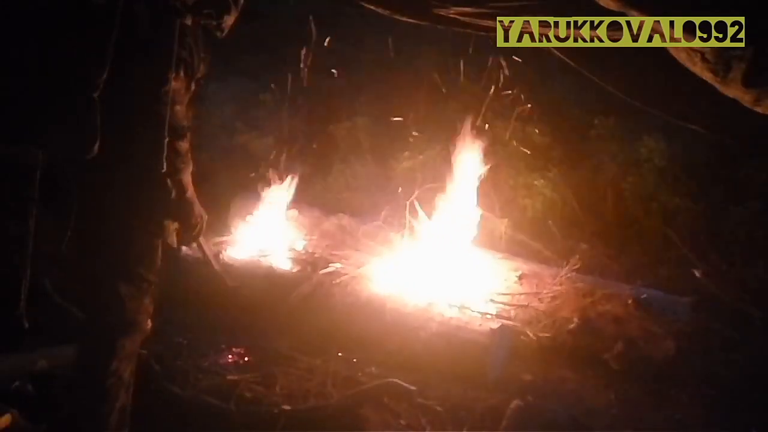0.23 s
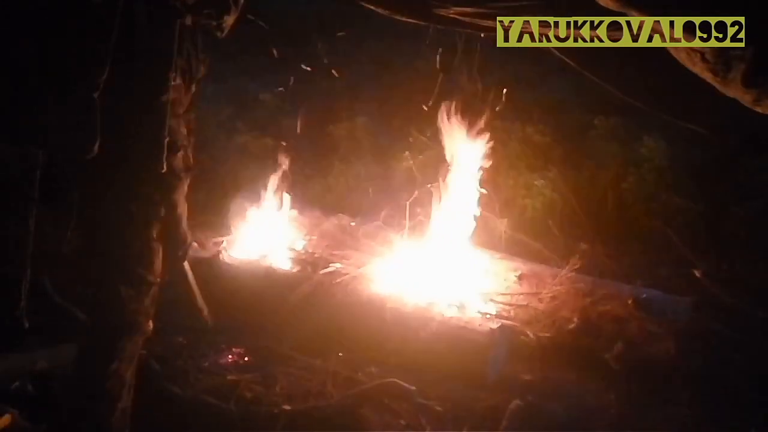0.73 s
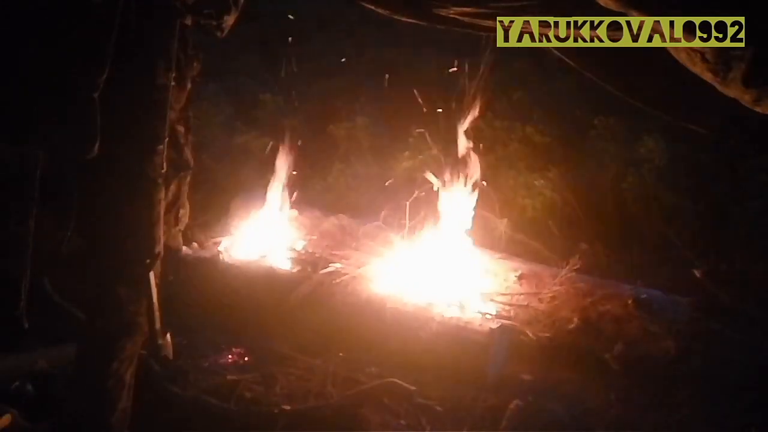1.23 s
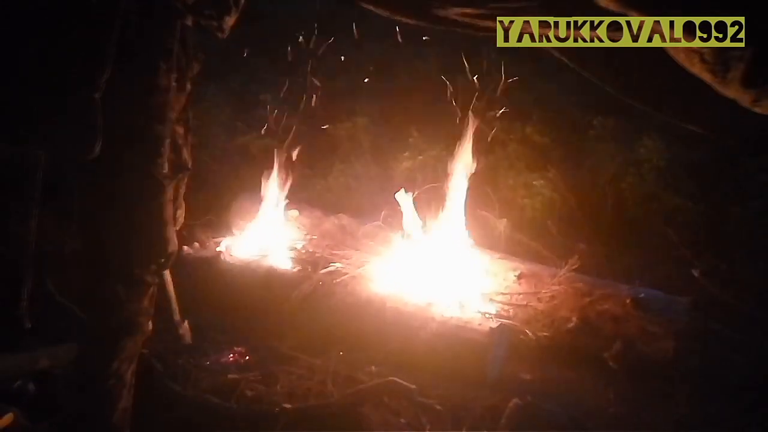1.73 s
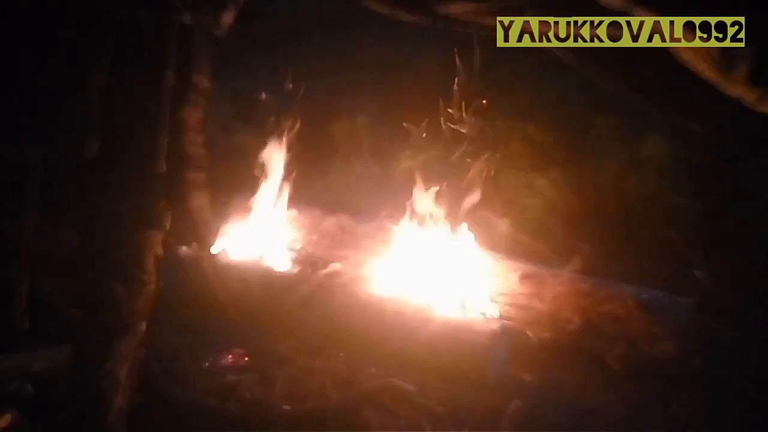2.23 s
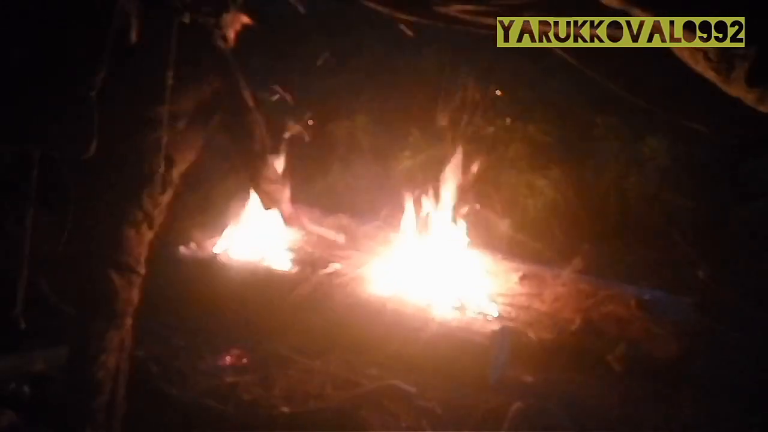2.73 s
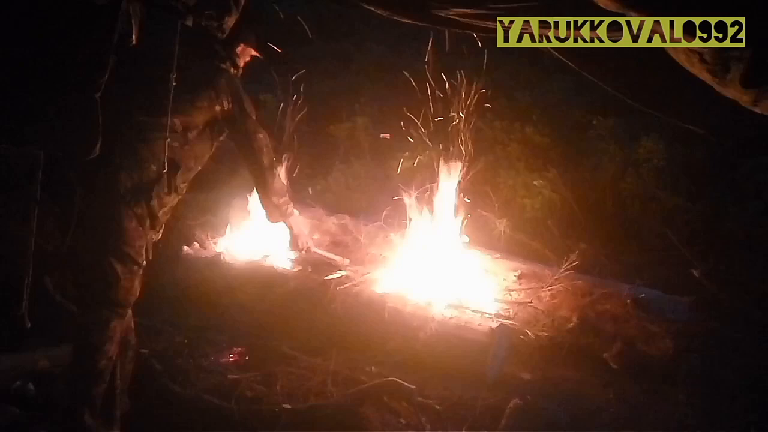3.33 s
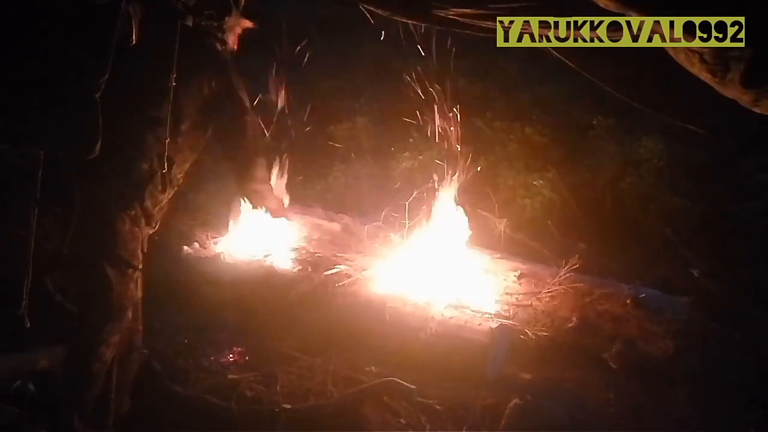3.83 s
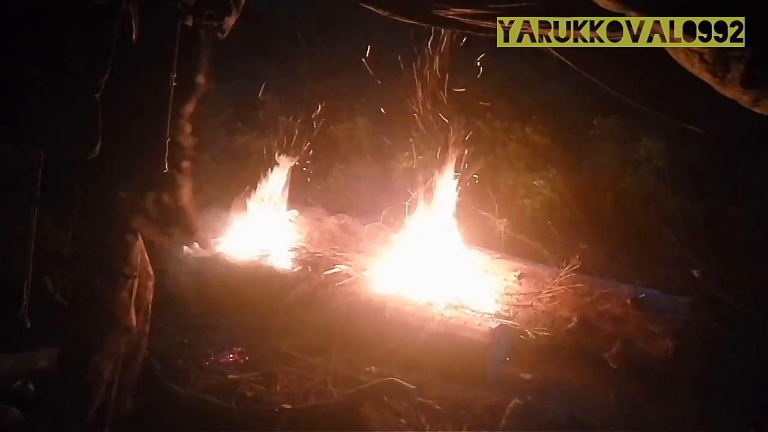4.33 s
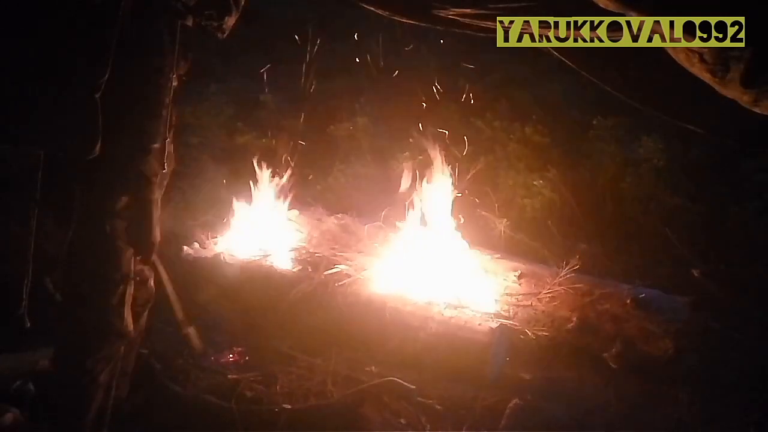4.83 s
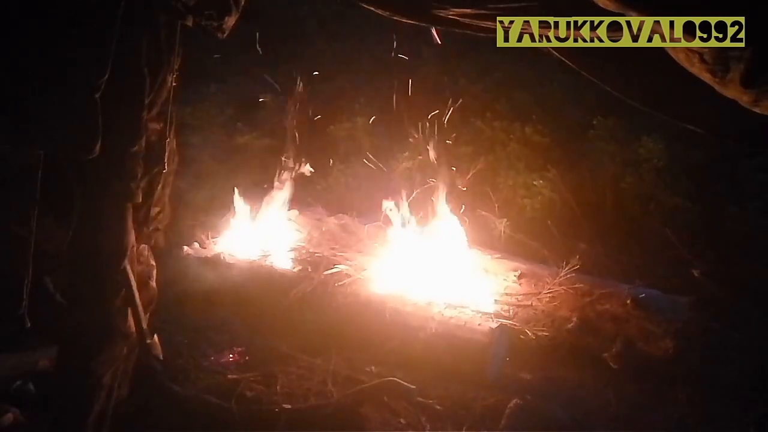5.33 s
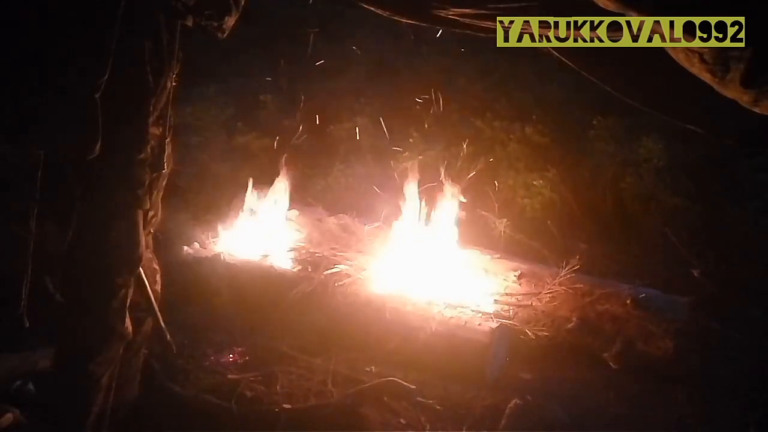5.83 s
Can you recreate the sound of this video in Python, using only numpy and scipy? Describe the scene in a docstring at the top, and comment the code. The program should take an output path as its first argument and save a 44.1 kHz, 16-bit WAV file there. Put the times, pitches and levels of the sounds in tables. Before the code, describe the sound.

Bright dry cracks of splitting wood burst at random over barely audible low flames, with brief sputtering gas spits and a short woodland tail.

```python
"""Sharp pops of splitting wood, hissing sap and low flames: a log fire outdoors at night, a few metres off.
Steam splits the wood: each fracture is a crack and torn fibres, ringing as snap, woody body and bright tick.
Smaller crackles, settling crumbs and ember ticks fall at random; a few knocks are decaying wood modes.
Gas jets, burning gas, sap and flames are coloured noise, and trunks and ground scatter a short tail.
The fire lies left of a small camera whose right microphone is turned away."""
import sys
import numpy as np
from scipy import signal
from scipy.fft import rfft, irfft
from scipy.io import wavfile
from scipy.ndimage import uniform_filter1d

SR = 44100
rng = np.random.default_rng(int(sys.argv[2]) if len(sys.argv) > 2 else 0)


def log_audio(samples):
    """Write samples as a 16-bit WAV file to the path given in sys.argv[1]."""
    # one column per channel
    frames = np.atleast_2d(samples).T
    # limit to full scale, then quantise
    limited = np.clip(frames, -1, 1)
    pcm = np.round(limited * 32767).astype(np.int16)
    wavfile.write(sys.argv[1], SR, pcm)


N = 268745
TIME = np.arange(N) / SR

# loud pops: start_s, snap_db, body_db (woody), tick_db (bright), pitch_hz (of the snap)
POPS = [(.145, -44, -55.5, -64, 5750), (0.1548, -43, -56.5, -66, 6000), (0.3341, -24.5, -58, -43, 5200),
        (0.354, -39.5, -54, -60, 5900), (0.4453, -41, -61, -57, 5900), (0.4638, -45, -55, -67, 5400),
        (0.4929, -31.5, -68, -55, 6960), (0.5107, -37, -49.5, -66, 5570), (0.539, -46, -62, -84, 4600),
        (0.5746, -52.5, -55.5, -69, 5700), (.6914, -17.3, -32, -44, 4830), (.737, -40.5, -70, -62, 5200),
        (0.7862, -46, -68, -79, 5370), (0.8137, -31.5, -59, -51, 6600), (1.0007, -39, -61.5, -59, 7000),
        (1.088, -21, -47, -41, 5600), (1.126, -39, -55, -54.5, 6100), (1.1989, -39, -54.5, -50, 6170),
        (1.24, -43, -64, -53.5, 7250), (1.2804, -44, -67, -64, 5800), (1.2981, -39, -55, -56, 5540),
        (1.771, -29.5, -61, -39.5, 6300), (1.87, -45.5, -64, -62, 6100), (1.9282, -46, -68, -62.5, 6000),
        (2.004, -54.5, -58.5, -69, 5800), (2.2835, -49, -57, -75, 5750), (2.4089, -37.5, -59, -52, 6600),
        (2.4215, -39.5, -56, -53.5, 6500), (2.5522, -46.5, -62, -68, 6400), (2.583, -48, -58, -71, 6200),
        (2.6029, -46.5, -65, -72, 6500), (2.7616, -51.5, -65.5, -71, 5540), (2.9807, -48, -64.5, -73, 6300),
        (3.1053, -45, -62.5, -67, 6140), (3.249, -46, -63, -58, 5840), (3.4756, -43.5, -75, -64.5, 7440),
        (3.5953, -40.5, -82, -65, 7250), (3.684, -47.5, -58.5, -63, 5760), (3.774, -44.5, -70, -63, 6250),
        (3.8293, -39, -50.5, -64, 4220), (3.8696, -32, -52.5, -45, 5430), (4.0039, -46, -64.5, -67, 5200),
        (4.1041, -40.5, -58, -54, 6260), (4.1562, -27, -51, -41, 5700), (4.3037, -48, -60.5, -74, 5360),
        (4.4803, -38, -51, -58.5, 6700), (4.5159, -39.5, -48.5, -55.5, 6560), (4.5229, -37, -60, -63, 7500),
        (4.5963, -47.5, -64, -74, 5000), (4.607, -46, -65, -67, 5430), (4.7008, -47.5, -67, -70, 6250),
        (4.7686, -46, -62, -66, 6700), (4.8252, -46, -54, -70, 5200), (4.8795, -30.5, -47, -51.5, 5800),
        (4.98, -33, -55, -47.5, 5200), (5.044, -50, -73, -74, 5850), (5.0823, -45, -63, -61, 6200),
        (5.193, -39.5, -54.5, -59, 6400), (5.222, -46, -58, -72, 5750), (5.2411, -37.5, -48, -54.5, 6200),
        (5.2946, -47, -56.5, -72, 5350), (5.3321, -37.5, -53.5, -66, 5600), (5.3644, -42.5, -54, -67, 5400),
        (5.3846, -43.5, -51.5, -66, 5770), (5.441, -48.5, -59.5, -75, 7100),
        (5.5802, -50.5, -54.5, -89, 5840), (5.7636, -46, -64, -58, 6540), (5.956, -47, -62.5, -67, 5500)]
# hiss of the boiling sap over time: time_s, relative_level_db
BOIL = [(0.0, -68), (0.36, -85), (0.54, -66.5), (0.68, -62.5), (0.83, -78), (1.05, -87), (1.19, -69.5),
        (1.59, -77.5), (1.93, -66.5), (2.81, -74.5), (2.92, -69.5), (5.43, -72), (5.55, -69), (6.09, -76)]
# scattered sound reaches the right microphone more evenly: frequency_hz, right_minus_left_db
SHADE_FAR = [(100, 8.5), (1200, 0), (3000, -4.5), (5000, -13.5), (6400, -21), (8000, -19.5), (14000, -6)]
# snap level of a pop of middling strength, dB
MIDDLING_DB = -42.5


def undb(db):
    """Decibels to gain."""
    return 10 ** (np.asarray(db) / 20)


def unit(x):
    """Scale to an energy of one."""
    return x / np.sqrt(np.sum(x ** 2) + 1e-18)


def response(points, size=1024):
    """Causal, minimum-phase impulse response with the given (Hz, dB) colour."""
    hz, db = np.transpose(points)
    freq = np.maximum(np.fft.rfftfreq(size, 1 / SR), 1)
    colour_db = np.interp(np.log(freq), np.log(hz), db)
    cepstrum = irfft(np.log(undb(colour_db)))
    # folding the cepstrum forward leaves no sound before the impulse
    cepstrum[1:size // 2] *= 2
    cepstrum[size // 2 + 1:] = 0
    return irfft(np.exp(rfft(cepstrum)))


def through(x, ir):
    """Pass a sound through an impulse response."""
    return signal.fftconvolve(x, ir)[:len(x)]


def resonate(x, hz, width_hz):
    """One resonance with a gain of one at its centre."""
    return signal.lfilter(*signal.iirpeak(min(hz, .45 * SR), hz / width_hz, fs=SR), x)


def add(track, s, sound):
    """Mix a sound into a track at a time in seconds."""
    start = max(int(s * SR), 0)
    part = track[..., start:start + sound.shape[-1]]
    part += sound[..., :part.shape[-1]]


def walk(rate):
    """Smoothed random wander with an RMS of one; rate in new values per second."""
    k = int(SR / rate)
    held = np.repeat(rng.standard_normal(N // k + 1), k)
    smooth = uniform_filter1d(uniform_filter1d(held, k), k)[:N]
    return unit(smooth) * np.sqrt(N)


def blow(x, db):
    """Give a short sound the energy of 5 ms at this level."""
    return unit(x) * undb(db) * np.sqrt(.005 * SR)


def pops(ring_width_hz=1600, broad=0.14, cavity_width_hz=380, cavity=1.26,
         body_tail_db=3.0, tick_tail_db=1, bend_db=3):
    """Each fracture rings in three registers; returns near left, near right and the part that scatters."""
    # colours of the three registers: frequency_hz, relative_level_db
    body_colour = [(80, -19.5), (300, -14.5), (700, -7), (1000, 2.5), (1300, -3), (1800, -1.5), (2400, 0),
                   (3300, -7), (6000, -52.5)]
    snap_colour = [(1200, -29.5), (2400, -9.5), (3200, -2.5), (4000, -3), (4800, -5), (5700, -2),
                   (6600, -1), (7300, -5), (8300, -16.5), (10000, -22.5), (16000, -47)]
    tick_colour = [(6000, -32), (8500, -3), (11000, -2.5), (12000, -6), (12900, -6.5), (14000, -8),
                   (15200, -11), (16500, -41.5)]
    # woody pops come from the thick log near the middle, thin ones from twigs at the left:
    # body level with no extra shade on the right, extra shade per dB less body, the most extra shade
    log_body_db, twig_shade_per_db, twig_shade_db = -44, 0.54, 7.5
    # a harder pop stands further out of its scattered tail (dB per dB)
    middling_tail_db, tail_per_db = -10.5, -0.2915
    # splinters' share of a middling pop's energy halves with each step of this many dB:
    # hard pops break cleanly
    splinter_share, cleaner_db = .5, 20
    # hollow note of the opened cavity against the snap pitch, and its scatter in octaves
    cavity_ratio, cavity_scatter = .28, .3

    out = np.zeros((3, N))
    body_ir, snap_ir, tick_ir = response(body_colour), response(snap_colour), response(tick_colour)
    for s, snap_db, body_db, tick_db, hz in list(POPS) + crackles():
        force_db = snap_db - MIDDLING_DB
        tail_db = middling_tail_db + tail_per_db * max(force_db, 0)
        shade_db = min(twig_shade_per_db * (log_body_db - body_db), twig_shade_db)
        cavity_hz = cavity_ratio * hz * 2 ** (cavity_scatter * rng.standard_normal())
        pushes, weights = fracture(splinter_share * .5 ** (force_db / cleaner_db))
        snap, body, tick = 0, 0, 0
        for push, weight in zip(pushes, weights):
            # the size of the split sets the pitch of its snap; the opened cavity adds a hollow note
            snap_push = broad * push + resonate(push, hz, ring_width_hz)
            body_push = push + cavity * resonate(push, cavity_hz, cavity_width_hz)
            snap = snap + weight * unit(through(snap_push, snap_ir))
            body = body + weight * unit(through(body_push, body_ir))
            tick = tick + weight * unit(through(push, tick_ir))
        snap, body, tick = blow(snap, snap_db), blow(body, body_db), blow(tick, tick_db)
        # low sound bends round obstacles and carries further among the trees
        right = undb(-shade_db) * (snap + tick) + undb(bend_db - .5 * shade_db) * body
        scattered = undb(tail_db) * (snap + undb(body_tail_db) * body + undb(tick_tail_db) * tick)
        add(out, s, np.array([snap + body + tick, right, scattered]))
    return out


def fracture(share, crack_s=0.00004, splinter_s=0.0025, bounce=0.45, grit=0.13, size=1536):
    """The wood gives way at once, then fibres tear for a few milliseconds; share is the fibres' energy."""
    t = np.arange(size) / SR
    crack, fibres = rng.standard_normal((2, size))
    crack = grit * unit(crack * np.exp(-t / crack_s)) + (t == 0)
    # a bounce off the neighbouring log follows within a millisecond and colours each crack differently
    lag = rng.integers(6, 24)
    crack = crack + bounce * np.pad(crack, (lag, 0))[:size]
    # squaring with the sign kept makes the tearing spiky
    fibres = fibres * np.abs(fibres) * np.exp(-t / splinter_s) * (t > .0005)
    share = np.clip(share, .02, .7)
    return np.array([crack, fibres]), np.sqrt([1 - share, share])


def crackles(count=36, spread_db=4, follow_boil=.7):
    """Small pops, one at random in each equal slot, louder while the sap boils hard; rows as in POPS."""
    # snap level before spread and boil; body and tick against the snap; range of pitch
    base_db, body_offset_db, tick_offset_db = -57.5, -11, -20
    low_hz, high_hz = 5200, 6700
    rows = []
    for k, (when, pitch, *chance) in enumerate(rng.random((count, 5))):
        s = (k + when) / count * TIME[-1]
        size_db, body_db, tick_db = spread_db * (2 * np.array(chance) - 1)
        db = base_db + size_db + follow_boil * liveliness(s)
        hz = low_hz + pitch * (high_hz - low_hz)
        rows.append((s, db, db + body_offset_db + body_db, db + tick_offset_db + tick_db, hz))
    return rows


def crumbs(count=4, within_s=0.051, longer_s_per_db=0.06, below_db=-12, ceiling_db=-42,
           spread_db=10, lead_s=.009, lead_db=-17):
    """After each listed pop the wood settles in micro-snaps, for longer after a hard one."""
    out = np.zeros(N)
    for s, snap_db, *_ in POPS:
        # two faint ticks come in the last 9 ms before each listed pop
        for when, softness, pitch, share in rng.random((2, 4)):
            db = min(snap_db + lead_db, ceiling_db) - spread_db * softness
            add(out, s - lead_s * when, ember_tick(db, np.sqrt(pitch), share))
        settle_s = within_s + longer_s_per_db * max(snap_db - MIDDLING_DB, 0)
        for when, softness, pitch, share in rng.random((count, 4)):
            db = min(snap_db + below_db, ceiling_db) - spread_db * (softness + when)
            add(out, s + settle_s * when, ember_tick(db, np.sqrt(pitch), share))
    return out


def embers(count=190, top_db=-55, spread_db=4, follow_boil=.7):
    """Charcoal ticks throughout, softer in the sap's lulls; small ticks are far more common than large ones."""
    out = np.zeros(N)
    for when, softness, pitch, share in rng.random((count, 4)):
        s = when * TIME[-1]
        db = top_db - spread_db * np.log(1 + 40 * softness) + follow_boil * liveliness(s)
        add(out, s, ember_tick(db, np.sqrt(pitch), share))
    return out


def ember_tick(db, pitch, share, width_hz=900):
    """One tiny fracture; pitch 0-1 runs from a dull tock to a fine tick."""
    # colour of the ticks: frequency_hz, relative_level_db
    ember_colour = [(300, -11), (1000, -3.5), (2200, -17), (4000, -4.5), (6100, 4.5), (7000, 1),
                    (8300, -9.5), (14000, -21), (16000, -30.5)]
    pushes, weights = fracture(share)
    push = weights[0] * unit(pushes[0]) + weights[1] * unit(pushes[1])
    ringing = 0.18 * push + resonate(push, 1000 * 7 ** pitch, width_hz)
    return blow(through(ringing, response(ember_colour)), db)


def knocks(size=4096):
    """A whole piece of wood is jolted and its modes ring briefly."""
    # dull knocks: start_s, level_db (before the bass cut)
    knock_table = [(3.8297, -41), (3.8703, -50)]
    # modes of the wood: frequency_hz (before detuning), relative_level_db, t60_s
    wood_modes = [(111, -19, 0.051), (216, -10.5, 0.023), (467, -32, 0.0082), (965, 2, 0.017),
                  (1060, -21, 0.024), (1820, -7, 0.022), (2240, -3.5, 0.019), (4100, -9, 0.017)]
    out, t = np.zeros(N), np.arange(size) / SR
    for s, db in knock_table:
        detune = 1 + 0.022 * rng.standard_normal(len(wood_modes))
        ring = np.zeros(size)
        for (hz, mode_db, t60), ratio in zip(wood_modes, detune):
            ring += undb(mode_db - 60 * t / t60) * np.sin(2 * np.pi * hz * ratio * t)
        add(out, s, blow(ring, db))
    # a high-pass at 90 Hz keeps deep bass out of the knocks
    return signal.sosfilt(signal.butter(2, 90, "highpass", fs=SR, output="sos"), out)


def spits(rough=0.666, rise_share=.65):
    """Gas squirts through a crack in short, sputtering jets; each swells faster than it falls."""
    # jets of gas: peak_s, level_db (left), fall_s, right_minus_left_db
    spit_table = [(0.371, -37, .003, -11), (0.388, -42, 0.0052, -18), (2.079, -53, 0.011, -24),
                  (2.815, -63, 0.006, -22), (2.878, -35.5, .0006, -32), (2.889, -41, 0.0024, 7.5),
                  (2.8978, -28, 0.0017, -30), (2.907, -37.5, .0036, -18), (3.389, -62, 0.012, -17),
                  (4.09, -59, 0.0036, -24), (4.74, -66, 0.016, -17), (4.939, -57.5, 0.018, -25)]
    # colour of the jets: frequency_hz, relative_level_db
    jet_colour = [(300, -29), (1500, -18.5), (2500, -14.5), (4000, -11.5), (6300, -8), (8300, -13),
                  (11000, -6.5), (13500, -4.5), (15300, -12.5), (16500, -40)]
    out = np.zeros((2, N))
    sputter = rng.standard_normal(N) * np.exp(rough * walk(2500))
    jet = unit(through(sputter, response(jet_colour))) * np.sqrt(N)
    for s, db, fall_s, right_db in spit_table:
        distance_s = np.maximum((s - TIME) / rise_share, TIME - s)
        swell = undb(db) * np.exp(-np.minimum(distance_s / fall_s, 20))
        out += np.outer([1, undb(right_db)], swell * jet)
    return out


def flare(jet, gain_db=-25, rumble_hz=300, burn_s=0.04):
    """Escaping gas catches fire with a soft, low puff."""
    band = signal.butter(2, [40, max(rumble_hz, 100)], "bandpass", fs=SR, output="sos")
    rumble = unit(signal.sosfilt(band, rng.standard_normal(N))) * np.sqrt(N)
    return undb(gain_db) * linger(jet, burn_s) * rumble


def linger(x, fade_s):
    """Level of a sound, held and slowly fading: the root of its exponentially averaged power."""
    power = through(x ** 2, np.exp(-TIME[:SR] / fade_s)) / (fade_s * SR)
    return np.sqrt(np.maximum(power, 0))


def sizzle(jet, gain_db=-2, waver_db=-0.3, grain=0.65, spray_db=-20, spray_s=.12):
    """Sap boils on the logs in a fine, wavering hiss; what a jet sprays out fizzes on for a moment."""
    # colour of the hiss: frequency_hz, relative_level_db
    sizzle_colour = [(800, -7.5), (2200, -8), (3500, -9.5), (5000, -8.5), (6100, 2.5), (6800, -2.5),
                     (7600, -7.5), (9000, -18.5), (14000, -22), (16000, -34.5)]
    sides = []
    for _ in range(2):
        grains = rng.standard_normal(N) * np.exp(grain * walk(900))
        sides.append(unit(through(grains, response(sizzle_colour))))
    left, right = sides
    boiling = undb(np.interp(TIME, *np.transpose(BOIL)) + gain_db)
    spray = undb(spray_db) * linger(jet, spray_s)
    level = np.hypot(boiling, spray) * undb(waver_db * walk(42))
    return level * np.sqrt(N) * np.array([left, through(right, response(SHADE_FAR))])


def liveliness(s):
    """How far the boiling of the sap is above the mean of its table at this time, in dB."""
    boil_s, boil_db = np.transpose(BOIL)
    return np.interp(s, boil_s, boil_db) - boil_db.mean()


def flames(level_db=-73.0, apart=0.49, flutter_db=1.7, flutter_hz=12):
    """The soft, fluttering rumble of burning gas, nearly alike on both sides."""
    # colour of the flames: frequency_hz, relative_level_db
    flame_colour = [(20, -18.5), (45, -2.5), (100, 6), (200, 1), (350, -2), (600, -3.5), (900, -14),
                    (1800, -17.5), (4000, -19), (7000, -24.5), (9000, -28), (16000, -33.5)]
    ir = response(flame_colour, size=4096)
    mid, side = (unit(through(rng.standard_normal(N), ir)) * np.sqrt(N) for _ in range(2))
    level = undb(level_db + flutter_db * walk(flutter_hz))
    return level * np.array([mid + apart * side, undb(-1.5) * (mid - apart * side)])


def scatter(x, early_s=0.017, late_s=0.037, late_db=-8, build_s=0.00053, lumpy_db=3, lumps_hz=700,
            dull_hz=7500):
    """Ground and near trunks answer first, in uneven clumps; trees further off leave a faint, duller tail."""
    t = TIME[:SR // 2]
    leaves = signal.butter(4, min(dull_hz, .45 * SR), fs=SR, output="sos")
    sides = []
    for _ in range(2):
        clumps = undb(lumpy_db * walk(lumps_hz)[:len(t)])
        build_up = 1 - np.exp(-(t / build_s) ** 2)
        early = clumps * rng.standard_normal(len(t)) * build_up * np.exp(-t / early_s)
        late = undb(late_db) * np.exp(-t / late_s) * signal.sosfilt(leaves, rng.standard_normal(len(t)))
        sides.append(through(x, unit(early + late)))
    return np.array([sides[0], through(sides[1], response(SHADE_FAR))])


def scene():
    """The fire lies to the left of the microphones, with the woods all round."""
    # the right microphone is turned away from the fire: frequency_hz, right_minus_left_db
    near_shade = [(100, -5.5), (900, -12), (2000, -8), (3200, -17.5), (5200, -17.5), (6300, -31),
                  (8000, -28.5), (12000, -13), (14300, -14.5)]
    left, right, scattered = pops()
    ticks, jets, wood = embers() + crumbs(), spits(), knocks()
    # direct pops and ticks reach the right microphone one sample later
    right = np.roll(through(right + ticks, response(near_shade)), 1)
    near = np.array([left + ticks, right])
    far = scatter(scattered + undb(-9.5) * ticks + undb(-6.0) * jets[0] + undb(-11.5) * wood)
    return near + jets + wood + far + flare(jets[0]) + flames() + sizzle(jets[0])


def record(dry):
    """The camera cuts the top of the treble, above 16 kHz."""
    return signal.sosfilt(signal.ellip(8, .2, 70, 16000, fs=SR, output="sos"), dry)


dry = scene()
out = record(dry)
log_audio(out)
```